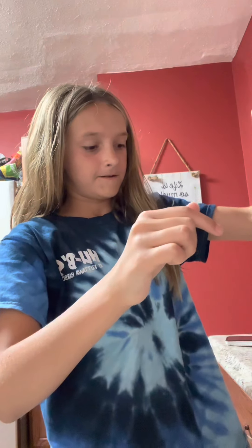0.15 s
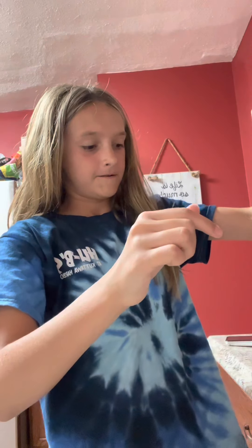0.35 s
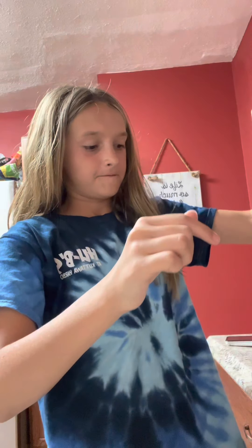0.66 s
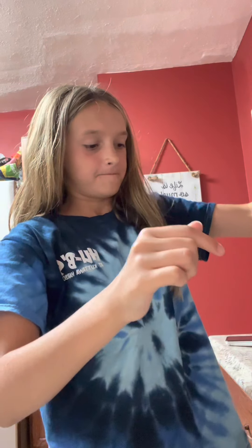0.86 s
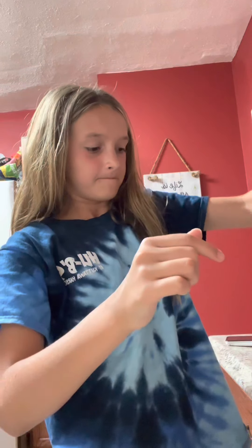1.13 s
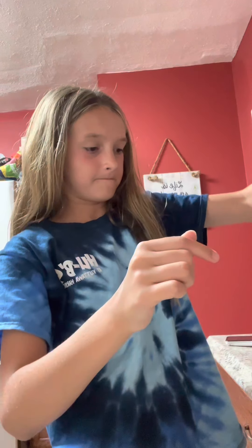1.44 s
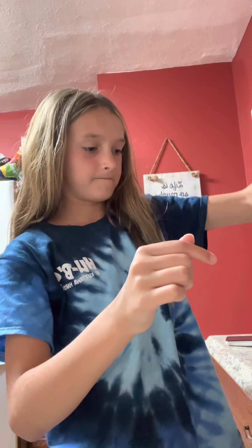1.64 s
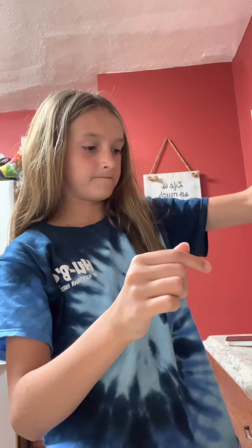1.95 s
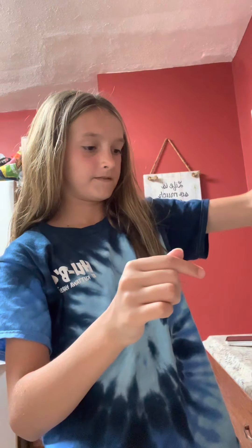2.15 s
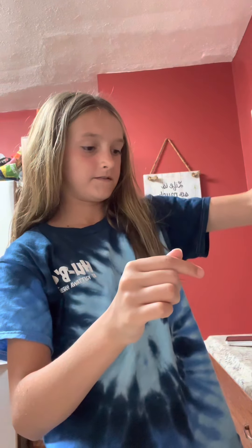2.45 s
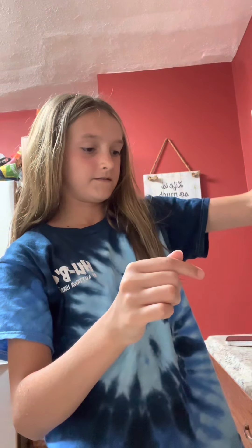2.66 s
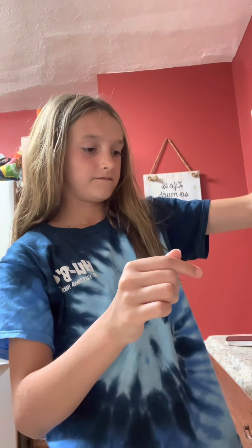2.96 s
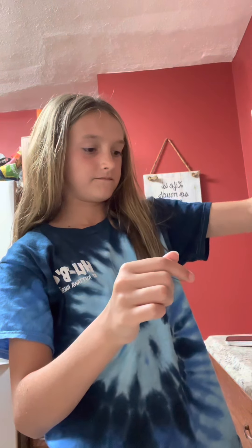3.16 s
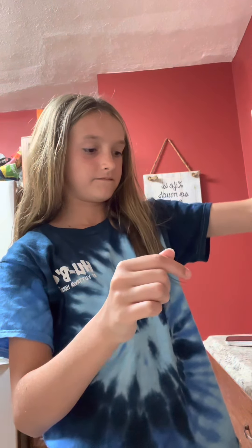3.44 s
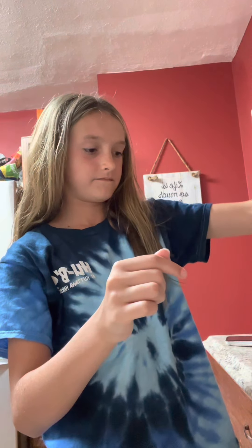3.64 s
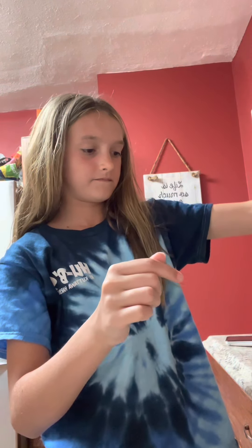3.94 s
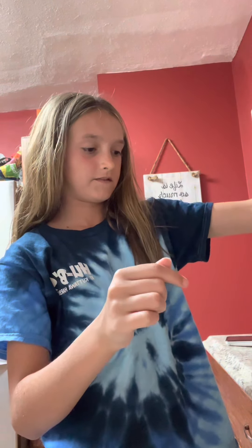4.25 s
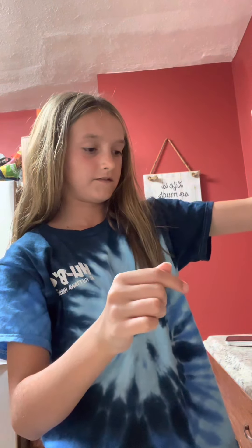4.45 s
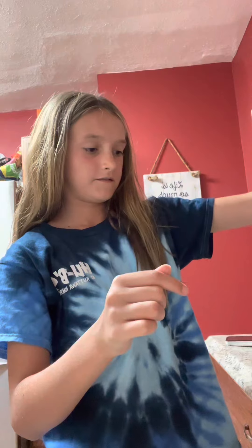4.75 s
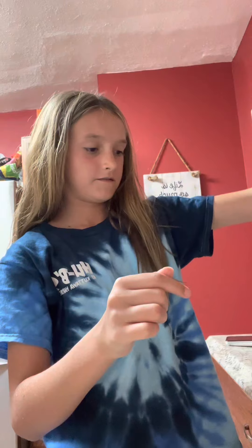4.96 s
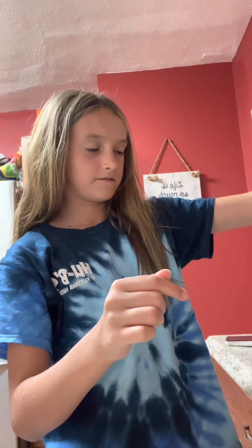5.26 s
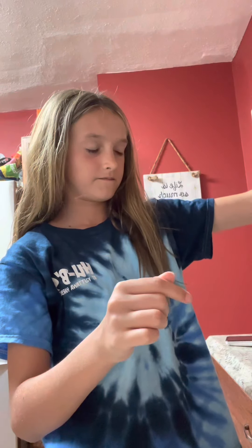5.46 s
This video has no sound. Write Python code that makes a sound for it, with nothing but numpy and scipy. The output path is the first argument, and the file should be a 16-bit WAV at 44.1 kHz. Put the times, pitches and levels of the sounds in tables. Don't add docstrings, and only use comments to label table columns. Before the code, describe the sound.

Light hollow thuds and papery crackle come in irregular shakes, several a second, as dry puffs drop into a bowl on the right. The rattling thins, pauses near the middle, resumes with one strong knock and scattered sharp snaps, then dies away to soft room tone and appliance hum. Handheld phone, stereo, short indoor reverberation.

```python
import sys
import numpy as np
from scipy import signal
from scipy.fft import rfft, irfft, next_fast_len
from scipy.io import wavfile
from scipy.ndimage import uniform_filter1d

SR = 44100
rng = np.random.default_rng(int(sys.argv[2]) if len(sys.argv) > 2 else 0)


def to_wav(sig):
    pcm = np.clip(np.atleast_2d(sig), -1, 1) * 32767
    pcm = np.round(pcm).astype(np.int16)
    wavfile.write(sys.argv[1], SR, pcm.T)


def makeup_ratio(level_db):
    decades = np.asarray(level_db, float) / 20
    return 10 ** decades


N = 246947

# frequency in Hz, density in dB per Hz.
ROOM_TONE_DB = [(30, -57), (60, 5.5), (110, 5.5), (160, -4), (230, -1), (500, -18.5), (1000, -22.5),
                (1500, -24), (3000, -24), (5600, -38), (6300, -26), (8000, -49), (10500, -41), (15000, -58)]
# centre in Hz, width in Hz, level in dB.
HUM = [(56.5, 22, -59.5), (115.2, 17.8, -50.5)]
# frequency in Hz, t60 in seconds.
KITCHEN_T60_S = [(200, 0.4), (2000, 0.27), (10000, 0.11)]
# frequency in Hz, likeness 0-1, left lead in radians, left over right in dB.
PORTS_BASS = [(40, .995, 0, -.5), (90, .99, .05, -1.5), (170, .985, .1, -2.5)]
# frequency in Hz, likeness
# 0-1, left lead in radians, left over right in dB.
STEREO_TOP = [(4750, .4, 4.3, -1.5), (5750, .8, 5.1, -.5), (6750, .8, 4.7, 0), (7200, .72, 4.2, 0),
              (7600, .8, 3.6, 0), (7880, .97, 3.14, 0), (9000, .99, 3.14, 0), (10300, .97, 3.14, 0),
              (11600, .62, 1.5, 0), (12300, .7, .8, 0), (12900, .98, 0, 0)]
STEREO = PORTS_BASS + [(353, 0.88, -0.11, -5.0), (805, 0.046, 2.4, -4), (1300, 0.49, 1.7, -2.5),
         (1830, 0.84, 1.4, -6), (2410, 0.92, 1.94, -5.5), (3300, 0.66, 2.55, 1.0),
         (4420, 0.07, 4.2, -2.0)] + STEREO_TOP
# frequency in Hz, left gain in dB.
BOWL_SIDE_DB = [(150, 3), (600, -7.5), (1400, -6), (3000, -6.5)]
# start in seconds, peak in dB, t60 in seconds, low edge in Hz, high edge in Hz.
TICKS = [(0.91, -41, .03, 2000, 14000), (1.05, -37, 0.099, 2500, 9000), (1.164, -31, 0.031, 4000, 13200),
         (2.076, -36.5, 0.2, 3300, 7000), (3.562, -31, 0.071, 2000, 7740), (4.05, -35.5, 0.5, 5700, 7400),
         (4.055, -29.5, 0.34, 3450, 4240), (4.335, -33, 0.26, 3500, 4350), (4.23, -31, 0.042, 3500, 14000),
         (4.466, -32, 0.018, 4000, 13900), (4.78, -33.5, 0.04, 4970, 13900),
         (5.2335, -37, 0.025, 1210, 13100), (.284, -21, 0.034, 1630, 2020),
         (5.352, -39.5, 0.68, 1080, 3760)]
# time in seconds, corn sliding in the bag in dB, loose puffs tumbling in the bowl in dB.
FLOW = [(0, -49.5, -34), (.4, -47, -41), (.68, -50.5, -40), (1, -49, -35), (1.13, -42, -39),
        (1.4, -48.5, -42), (2.04, -53.5, -39), (2.1, -46, -39), (2.5, -50, -36), (2.8, -54.5, -51),
        (3.53, -56, -40.5), (3.57, -43.5, -41), (3.8, -53, -40.5), (4.05, -53, -45), (4.45, -53, -39.5),
        (4.93, -45.5, -71), (5.14, -62, -59), (5.6, -68, -55.5)]
# frequency in Hz, density in dB per Hz.
PUFFS_TOP = [(6750, -19), (7600, -21.5), (9000, -21), (10500, -24.5), (12300, -21), (15000, -23)]
# frequency in Hz, density in dB per Hz.
PUFFS_DB = [(200, 2), (500, -10), (1300, -10.0), (1900, -9.5), (2700, -10), (3500, -11.5), (4500, -16),
            (5500, -19)] + PUFFS_TOP
# start in seconds, length in
# seconds, belly in dB, rim in dB, spray of crumbs in dB.
POUR_SHAKES = [(.03, 0.056, -21, -24, -50.5), (.205, 0.059, -23, -19, -53.5),
               (0.284, 0.063, -35, -25, -55.5), (0.344, 0.052, -22.5, -26.5, -55),
               (.39, 0.064, -15, -17, -50.5), (0.474, 0.077, -34, -30, -67), (0.547, .06, -24.5, -22, -58),
               (.73, 0.061, -26.5, -23, -51.5), (0.908, 0.056, -22, -18, -55), (0.988, 0.063, -34, -33, -60),
               (1.075, .08, -23, -20.5, -50.5), (1.209, 0.066, -23, -29, -69),
               (1.411, 0.063, -22.5, -20.5, -55), (1.587, 0.052, -29, -27.5, -59),
               (1.751, .075, -27, -29, -53), (1.924, 0.046, -25.5, -27.5, -71),
               (2.097, 0.044, -26, -32, -59), (2.28, 0.062, -22.5, -28.5, -54),
               (2.377, 0.046, -42, -34, -53), (2.488, 0.055, -29, -28.5, -64),
               (2.617, 0.034, -30.5, -30, -57.5), (2.7, .045, -26, -29.5, -53),
               (3.025, .04, -41, -40, -53.5), (3.245, 0.048, -29.5, -35, -64), (3.454, .04, -23, -26.5, -54),
             (3.595, .06, -21, -28, -65), (3.69, .055, -34, -33, -72), (3.785, 0.077, -26, -34, -57.5),
             (4.135, 0.052, -22, -26.5, -51.5), (4.055, 0.053, -49, -47, -59.5),
             (4.199, 0.073, -30.5, -26.5, -55.5), (4.3, 0.056, -28.5, -31, -53),
             (4.365, .11, -24.5, -30, -52), (4.54, 0.055, -24.5, -26.5, -76),
             (4.615, 0.12, -33, -28.5, -56), (4.754, .045, -29.5, -47, -61), (4.871, 0.061, -50, -53, -55)]
# time in seconds, belly in dB, rim in dB.
HEAVY_CLUMPS = [(.036, -17, -28), (.054, -22, -22), (.221, -17.5, -20), (.285, -20.5, -17.5),
                (.358, -19, -37), (.402, -20, -20), (.416, -29, -21), (.437, -27, -21), (.562, -22.5, -20),
                (.579, -21, -27), (.729, -16.5, -27), (0.741, -20.5, -24), (.913, -15.5, -26),
                (1.108, -15, -18), (1.42, -35, -21), (1.453, -19.5, -26), (1.961, -18.5, -18.5),
                (2.121, -15.5, -17.5), (2.318, -15.5, -19), (2.504, -18.5, -24), (2.485, -28, -23),
                (2.539, -23, -39), (3.477, -18.5, -27), (3.634, -25, -29), (4.15, -11, -19.5),
                (4.172, -24, -38), (4.233, -21, -23), (4.332, -19.5, -22), (4.564, -23.5, -31),
                (5.232, -30, -27)]
# frequency in Hz, level in dB, t60 in seconds.
BELLY_MODES = [(202, -5.5, 0.045), (282, -5.5, 0.1), (357, -8, 0.02), (399.4, -0.5, 0.058),
               (478.4, -5, 0.097), (588, 3, 0.03), (678, -3.5, 0.074)]
# frequency in Hz, level in dB, t60 in seconds.
RIM_MODES = [(815, -3.5, 0.0058), (1060, -6, 0.045), (1410, -2.5, 0.0088), (1696, -5, 0.025),
             (1832, -4, 0.021), (2280, -7.5, 0.015), (2529, -3.5, 0.02), (3300, -8.5, 0.011)]

SHAKES = POUR_SHAKES


def unit(x):
    return x / np.sqrt(np.mean(x ** 2) + 1e-20)


def along(points, hz, column=1):
    table = np.transpose(points)
    return np.interp(np.log(hz + 1), np.log(table[0] + 1), table[column])


def filtered(x, response):
    m = next_fast_len(N + SR // 2)
    return irfft(rfft(x, m) * response(np.fft.rfftfreq(m, 1 / SR)), m)[..., :N]


def spikes(times_s, sizes):
    at = np.clip(np.round(times_s * SR).astype(int), 0, N - 1)
    return np.bincount(at.ravel(), sizes.ravel(), N)


def at_ports(shared, stray):
    side = np.array([[.5], [-.5]])

    def turn(hz):
        return np.arccos(np.clip(along(STEREO, hz), 0, 1)) / 2

    def port(hz):
        lead_rad = along(STEREO, hz, column=2)
        return makeup_ratio(side * along(STEREO, hz, column=3)) * np.exp(1j * side * lead_rad)

    alike = filtered(shared, lambda hz: port(hz) * np.cos(turn(hz)))
    unlike = filtered(stray, lambda hz: 2 * side * port(hz) * np.sin(turn(hz)))
    return alike + unlike


def appliance():
    noise = rng.standard_normal((2, N))
    tone = makeup_ratio(-47.0) * unit(filtered(noise, lambda hz: makeup_ratio(along(ROOM_TONE_DB, hz)) * (hz > 12)))
    for centre_hz, width_hz, db in HUM:
        noise = rng.standard_normal(N)
        hum = filtered(noise, lambda hz: np.exp(-((hz - centre_hz) / width_hz) ** 2))
        tone[0] += makeup_ratio(db) * unit(hum)
    return tone


def kitchen(x):
    out, step = np.zeros((2, N + SR)), SR // 4
    for start in range(0, N, step):
        hz, t, z = signal.stft(rng.standard_normal((2, SR // 3)), SR, nperseg=256)
        decay = makeup_ratio(-60 * t / along(KITCHEN_T60_S, hz)[:, None])
        tail = signal.istft(z * decay, SR, nperseg=256)[1]
        tail = tail / np.linalg.norm(tail[0])
        wet = signal.fftconvolve(x[None, start:start + step], tail, axes=1)
        out[:, start + 300:][:, :wet.shape[1]] += wet
    return out[:, :N]


def scattered(x, count):
    z = signal.stft(x, nperseg=256)[2]
    turns = rng.uniform(0, 2 * np.pi, (z.shape[0], z.shape[1] // count + 1))
    turns = np.repeat(turns, count, axis=1)[:, :z.shape[1]]
    return np.sqrt(2) * signal.istft(z * np.exp(1j * turns), nperseg=256)[1][:N]


def placed(direct, stray, room_db):
    shared, own = np.array([direct, stray]) + makeup_ratio(room_db) * kitchen(direct)
    return at_ports(shared, own)


def ticks():
    out, t = np.zeros((2, N + SR)), np.arange(SR // 3) / SR
    for s, db, t60_s, low_hz, high_hz in TICKS:
        crack = makeup_ratio(db - 60 * t / max(t60_s, .003)) * rng.standard_normal((2, len(t)))
        band = signal.butter(2, [low_hz, high_hz], "band", fs=SR)
        out[:, round(s * SR):][:, :len(t)] += signal.lfilter(*band, crack)
    return out[:, :N]


def clumps(count):
    edge_loss_db, scatter_db = 5.5, 2.5
    heaviest_at = 0.36
    start, length, belly_db, rim_db, _ = np.transpose(SHAKES)[:, :, None]
    luck = rng.uniform(-0.99, 1, (len(start), 3, count))
    place = (np.arange(count) + .5 + 0.4074 * luck[:, 0]) / count
    weight_db = -edge_loss_db * (2 * (place - heaviest_at)) ** 2
    run = [start + length * place,
           belly_db + weight_db + scatter_db * luck[:, 1],
           rim_db + weight_db + scatter_db * luck[:, 2]]
    return np.hstack([np.reshape(run, (3, -1)), np.transpose(HEAVY_CLUMPS)])


def jolts(landed, gain_db, t60_s):
    s, _, rim_db = landed
    decay = makeup_ratio(-120 / (max(t60_s, .005) * SR))
    return signal.lfilter([1], [1, -decay], spikes(s, makeup_ratio(2 * (rim_db + gain_db))))


def swells(rise_db_s, fall_db_s, full_from, full_to):
    start, length, _, _, spray_db = np.transpose(SHAKES)[:, :, None]
    t = np.arange(0, N, 32) / SR
    early_s = np.maximum(start + full_from * length - t, 0)
    late_s = np.maximum(t - start - full_to * length, 0)
    db = spray_db - rise_db_s * early_s - fall_db_s * late_s
    return np.interp(np.arange(N) / SR, t, makeup_ratio(2 * db).sum(axis=0))


def patchy(x, depth_db):
    z = signal.stft(x, nperseg=256)[2]
    field = uniform_filter1d(rng.standard_normal(z.shape), size=5, axis=0)
    field = uniform_filter1d(field, size=16, axis=1)
    return signal.istft(z * makeup_ratio(depth_db * unit(field)), nperseg=256)[1][:N]


def puffs(landed):
    crisp_under_db, rustle_over_db = -9, 2.5
    s, slide_db, _ = np.transpose(FLOW)
    slide = makeup_ratio(2 * np.interp(np.arange(N) / SR, s, slide_db))

    when_s = rng.uniform(0, N / SR, 22000)
    size = makeup_ratio(np.minimum(3.2 * rng.exponential(1, when_s.shape), 12))
    grains = unit(spikes(when_s, size * rng.standard_normal(when_s.shape)))
    heap = patchy(1.03 * grains + rng.standard_normal(N), depth_db=1.32)
    dry = filtered(heap, lambda hz: makeup_ratio(along(PUFFS_DB, hz)) * hz ** 2 / (hz ** 2 + 220 ** 2))
    top = filtered(dry, lambda hz: 1 / (1 + (7800 / (hz + 1)) ** 8))

    spray = swells(220, 174, full_from=0.13, full_to=0.88)
    power = makeup_ratio(15) * (slide + makeup_ratio(2 * rustle_over_db) * spray)
    rustle = np.sqrt(power + jolts(landed, gain_db=-25, t60_s=0.07))
    spray = swells(470, 400, full_from=0.1, full_to=0.78)
    power = makeup_ratio(9) * (makeup_ratio(2 * crisp_under_db) * slide + spray)
    crisp = np.sqrt(power + jolts(landed, gain_db=-24, t60_s=0.038))
    return rustle * unit(dry - top) + crisp * unit(top)


def rung(modes, times_s, sizes, scatter_db):
    out = np.zeros(N)
    for hz, db, t60_s in modes:
        share = makeup_ratio(db + scatter_db * rng.standard_normal(times_s.shape))
        share = share * np.sign(rng.standard_normal(times_s.shape))
        r, w = makeup_ratio(-60 / (max(t60_s, .003) * SR)), 2 * np.pi * hz / SR
        blows = spikes(times_s, sizes * share)
        out += signal.lfilter([0, np.sin(w)], [1, -2 * r * np.cos(w), r * r], blows)
    return out


def bowl(landed):
    s, belly_db, rim_db = landed[:, :, None]
    late_s = rng.exponential(1, (len(s), 11)) * .007 - .002
    late_s[:, 0] = 0
    drop_db = -7.5 - 400 * np.abs(late_s) + 2.0 * rng.standard_normal(late_s.shape)
    drop_db[:, 0] = 0
    belly = rung(BELLY_MODES, s + late_s, makeup_ratio(belly_db + drop_db - 10), scatter_db=-0.53)
    rim = rung(RIM_MODES, s + late_s, makeup_ratio(rim_db + drop_db - 9.5), scatter_db=2.5)

    when_s = rng.uniform(0, N / SR, 5000)
    flow_s, _, tumble_db = np.transpose(FLOW)
    luck_db = np.minimum(2.57 * rng.exponential(1, when_s.shape), 13)
    size = makeup_ratio(np.interp(when_s, flow_s, tumble_db) + luck_db)
    loose = makeup_ratio(-12.5) * rung(RIM_MODES, when_s, size, scatter_db=2.0)
    loose += makeup_ratio(-20.5) * rung(BELLY_MODES, when_s, size, scatter_db=7.5)
    return filtered(belly + rim + loose, lambda hz: (1j * hz / (130 + 1j * hz)) ** 3)


def scene():
    landed = clumps(count=7)
    wall, heap, kernels = bowl(landed), puffs(landed), ticks()
    corn = placed(heap + kernels[0], scattered(heap, count=6) + kernels[1], room_db=-9)
    knocks = placed(wall, scattered(wall, count=6), room_db=-10.5)
    left_only = np.array([[1], [0]])
    shaded = filtered(knocks, lambda hz: makeup_ratio(left_only * along(BOWL_SIDE_DB, hz)))
    return at_ports(*appliance()) + corn + shaded


def low_pass(x):
    return signal.sosfilt(signal.butter(12, 15830, fs=SR, output="sos"), x)


def record(dry):
    mix = filtered(dry, lambda hz: hz < 15830)
    return low_pass(mix)


dry = scene()
out = record(dry)
to_wav(out)
```